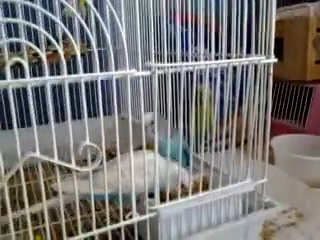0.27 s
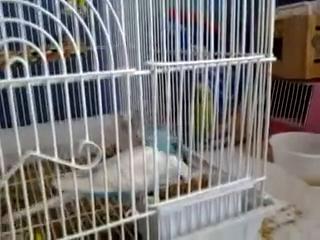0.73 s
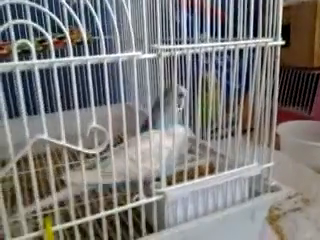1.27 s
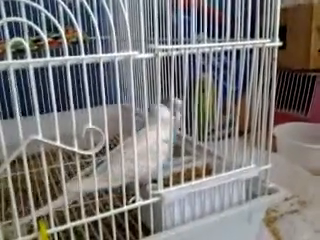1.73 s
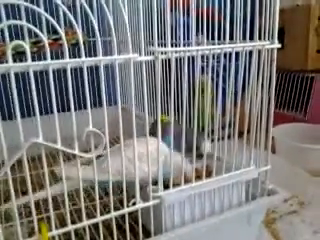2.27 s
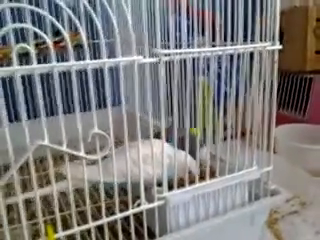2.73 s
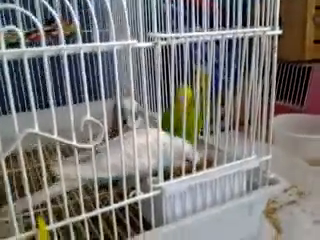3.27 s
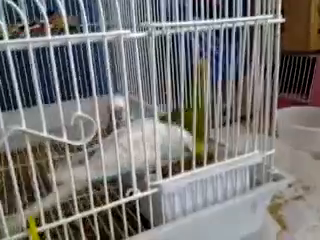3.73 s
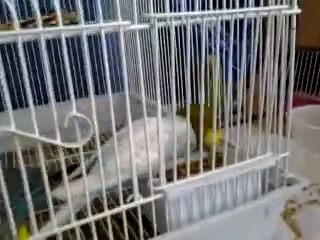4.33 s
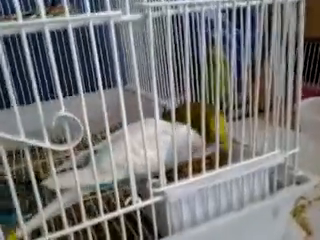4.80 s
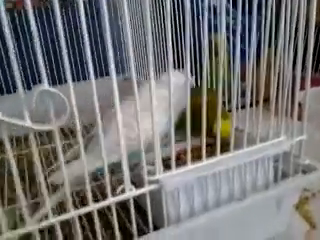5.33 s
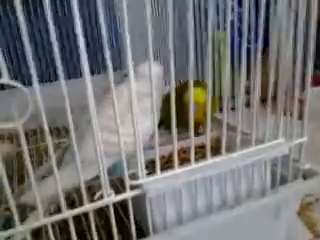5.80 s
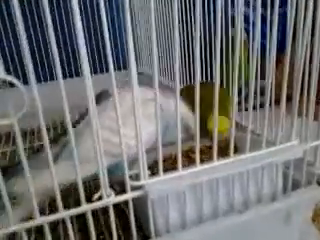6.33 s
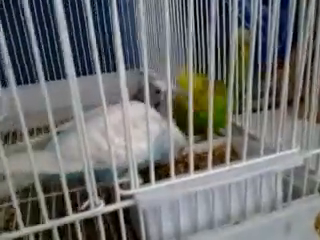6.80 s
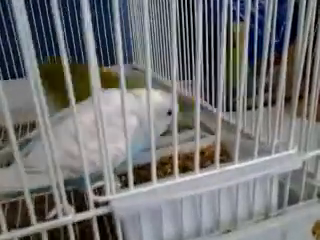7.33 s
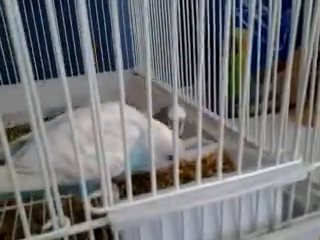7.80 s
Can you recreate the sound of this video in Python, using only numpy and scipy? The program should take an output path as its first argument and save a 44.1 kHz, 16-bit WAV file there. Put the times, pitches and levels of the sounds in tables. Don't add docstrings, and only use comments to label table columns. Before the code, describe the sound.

Indoors, small parrots feed at a plastic dish close to a cheap camera microphone. Low appliance hum, soft air noise and a faint breathy duct note continue throughout. In the first 0.3 seconds, a cluster of dull knocks on furniture rings in the room, with a low stir beneath. A beak taps the dish at 0.4, then harder plastic clacks come at 0.8, 1.1 and 1.2, mixed with short husk rasps. Crisp seed cracks scatter from 1.3 to 3.8, with a light tap at 2.2. Around 4.3 to 4.6 come soft distant knocks, a rasp and another light tap; small ticks follow at 5. At 5.55 a tiny squeak rises, breaks hoarsely and falls, trailed by grinding. Sharp snaps stand out at 6.0, 6.45 (the brightest) and 7.1, a smaller one at 7.5, and muffled knocks close near 7.7 to 7.9. Treble is coarse and cut off.

```python
import sys
import numpy as np
from scipy import signal
from scipy.fft import rfft, irfft, dct, next_fast_len
from scipy.io import wavfile
from scipy.ndimage import uniform_filter1d

SR = 44100
rng = np.random.default_rng(int(sys.argv[2]) if len(sys.argv) > 2 else 0)


def to_wav(sig):
    pcm = np.clip(np.atleast_2d(sig), -1, 1) * 32767
    pcm = np.round(pcm).astype(np.int16)
    wavfile.write(sys.argv[1], SR, pcm.T)


def invert_db(x):
    u = np.asarray(x, float) / 20
    return 10 ** u


N = 355798
T = np.arange(N) / SR

# frequency in Hz, density in dB per Hz.
RUMBLE = [(5, 2.5), (24, 3), (34, 1.5), (41, 3), (52, -7), (75, -4), (92, 0.5), (110, -3.5), (145, -6),
          (175, -8.5)]
# frequency in Hz, density in dB per Hz.
AIR = [(223, -9.5), (300, -6.5), (515, -11.5), (754, -5), (930, -9), (1470, -6.5), (2100, -9.5),
       (3000, -12), (3600, -14), (4300, -19), (5200, -18.5), (6200, -19), (7500, -28)]
AIR_DB, AIR_SWELL_DB = -45.6, .3
BUSTLE_DB, BUSTLE_FADE_S = 4, .1

# frequency in Hz, width in Hz, level in dB.
HUM = [(61.2, 4, -57.5), (120.7, 5.9, -61.5), (266.3, 3.8, -68), (317.3, 14, -66), (352.7, 10, -68),
       (441, 7.9, -72), (577, 12, -70), (1400, 200, -60.5)]
DUCT_DB, DUCT_SWELL_DB = -59.5, 1.5
# peak in seconds, rise in dB, width in seconds.
DRAUGHTS = [
    (1.6, 4, .35),
    (2.3, 5, .1),
    (2.83, 3, .08),
    (4.99, 6, .07),
    (7.3, 6, .2),
]
BOOM_DB = -67
# time in seconds, level in dB, swell in
# seconds, # fade in seconds.
SWELLS = [
    (0.03, -49, .02, .12),
    (.3, -53, .12, .04),
    (4.45, -58, .06, .15),
    (4.74, -57, .15, .08),
    (6.33, -61, .1, .1),
    (7.84, -54, .12, .12),
]

# start in seconds, level in dB, main note in Hz, blow in ms, thump in dB.
KNOCKS = [(.010, -48, 1480, 22, -12), (.019, -36, 1280, 8.6, -20), (.05, -50, 1100, 25, -8),
          (0.114, -41.5, 634, 8.3, -5), (.161, -36, 640, 7.9, -15), (.2, -53, 780, 19, -8),
          (.269, -37.5, 1900, 5.8, -6), (.305, -47, 620, 19, 1), (4.26, -52, 690, 49, -17),
          (4.31, -46.5, 1320, 26, -14), (4.521, -55.5, 1400, 49, -14), (6.156, -48.5, 1240, 27, -17),
          (7.701, -43.5, 1230, 25, -16), (7.722, -46, 884, 19, -14), (7.8, -52, 1250, 12, -8),
          (7.858, -53, 1420, 29, -7)]
# frequency in Hz, width in Hz, level in dB.
KNOCK_BODY = [(620, 200, -6), (1050, 300, -2), (1450, 400, -4), (1950, 500, -4), (2500, 500, -5)]
KNOCK_REACH_HZ_MS = 40000
ROOM_T60_S, ROOM_DB = 0.62, -7

# time in seconds, pitch in Hz, level in dB.
SQUEAK = [
    (5.548, 1475, -66),
    (5.557, 1536, -42),
    (5.566, 1638, -40),
    (5.574, 1682, -35),
    (5.58, 1534, -37),
    (5.587, 1400, -38.5),
    (5.594, 1290, -44.5),
    (5.601, 1130, -52),
    (5.612, 1000, -60),
]
THROAT_HZ, THROAT_WIDTH_HZ, THROAT_DB = 3400, 420, 2
BREAK_S, BREAK_LENGTH_S = 5.577, .016
CLEAR_DB, HOARSE_DB = -15, -4

# start in seconds, level in dB, length in ms, middle hollow in dB, top hollow in dB.
GRINDS = [(.809, -42.5, 11.3, -1, -11), (.822, -46.5, 21, -2, -7), (.894, -41, 18, -0.5, -21),
          (.942, -45.5, 17, -5.5, -19), (1.133, -44, 17, 3, -11), (2.237, -47, 9.3, -1, -17),
          (2.774, -47, 11, 0, -9), (2.817, -52.5, 39, -4, 0), (2.918, -52.5, 20, 5, 6),
          (4.463, -44, 17, 1, -7), (5.58, -47, 27, -2, 4), (5.61, -51.5, 28, -4, -1),
          (5.641, -41, 18, 7, -9.5), (6.45, -48, 14, 0, 6), (7.255, -56.5, 8.3, -6, 10),
          (7.472, -56.5, 9.5, 4, 12)]
# frequency in Hz, width in Hz.
BEAK = [(2250, 820), (4450, 550), (6000, 1400)]

# start in seconds, peak in dB, brightest note in Hz, dish thud in dB.
CRACKS = [(0.7841, -37, 4530, -15), (1.3053, -37, 6900, -17), (1.4572, -35, 5730, -18),
          (1.475, -46, 4760, -12), (1.632, -40, 6800, -15), (1.718, -37, 6670, -16),
          (1.7414, -38.5, 6790, -3), (2.3754, -48, 5890, -1), (2.445, -38, 5080, -8),
          (2.6751, -33, 5900, -23), (2.9238, -33, 4930, -13), (3.1328, -41, 5660, -7),
          (3.2336, -40, 6770, -8), (3.2404, -40.5, 6020, -15), (3.336, -36, 5530, -18),
          (3.3874, -44, 5870, -7), (3.801, -38, 5560, -15), (4.9952, -48, 6620, 1), (5.0414, -45, 5770, -2),
          (5.0624, -36.5, 6800, -14), (5.4249, -39, 6040, -3.5), (5.914, -42, 5150, -6),
          (5.9977, -30, 5670, -29), (6.3937, -40, 6600, -11), (6.398, -39.5, 5700, -14),
          (6.4463, -25.5, 5370, -20), (7.113, -30.5, 5800, -17), (7.4702, -37, 6010, -13)]
# frequency in Hz, width in Hz, level in dB.
DISH = [(810, 500, -8.5), (1580, 800, -1), (2400, 810, -2.5)]
SPLINTER_MS, SCATTER_DB = .62, -16

# start in seconds, peak in dB, wall in dB, rim in dB,
# pitch of the struck spot as a ratio.
STRIKES = [
    (.3776, -24, -22, -3, .62),
    (0.8071, -22, -8, -2, .9),
    (1.0971, -18.5, -7, -4.5, .99),
    (1.196, -22, -12, 1, .88),
    (2.2361, -34, -6, -2, .99),
    (4.6201, -34, -11, 2, .8),
]
# frequency in Hz, width in Hz, level in dB.
WALL = [(760, 350, 3), (300, 260, -7)]
# frequency in Hz, width in Hz, level in dB.
RIM = [(1590, 600, -5), (2400, 600, 2), (2800, 400, 0)]
# frequency in Hz, width in Hz, level in dB.
EDGE = [(4200, 700, 2), (5250, 450, 6), (6660, 1200, -8.5)]
CONTACT_MS, RATTLE, WALL_LAG_MS = .9, .12, 1.2

CAMERA_HZ = 16000
# start in seconds, end in seconds, lost above in Hz.
DROPOUTS = [
    (.851, .855, 4300),
    (1.051, 1.086, 4200),
    (1.106, 1.111, 4500),
    (5.531, 5.553, 4500),
    (6.427, 6.438, 6200),
]
BLOCK_S = .064
# first in seconds, last in seconds, first level in dB,
# last level in dB.
PIP_RUNS = [(.0804, .2723, -76, -75), (.7856, .911, -74.5, -66.5), (1.1034, 1.1034, -54, -54),
            (1.296, 1.488, -79, -64), (1.6795, 1.7439, -64, -74), (2.2566, 2.2566, -59, -59),
            (2.449, 2.449, -70.5, -70.5), (2.7038, 2.832, -66, -63), (2.896, 2.961, -77.5, -61),
            (3.2805, 3.3455, -75.5, -56), (3.4082, 3.4082, -69.5, -69.5), (3.7918, 3.8561, -82.5, -75),
            (4.496, 4.6867, -66.5, -68), (5.1362, 5.1362, -81, -81), (5.456, 5.456, -72.5, -72.5),
            (5.5842, 5.5842, -68.5, -68.5), (5.7119, 5.7119, -81, -81), (6.0313, 6.2236, -74, -70),
            (6.4154, 6.4797, -64.5, -66.5), (7.1203, 7.1833, -65, -77.5), (7.5038, 7.5038, -71, -71),
            (7.6959, 7.7598, -81, -79)]


def unit(x):
    return x / np.sqrt(np.mean(x ** 2))


def ring(x, hz, width):
    return signal.lfilter(*signal.iirpeak(hz, hz / width, fs=SR), x)


def body(x, modes):
    return sum((-1) ** k * invert_db(db) * ring(x, hz, width) for k, (hz, width, db) in enumerate(modes))


def add(out, s, sound):
    i = int(s * SR)
    out[i:i + len(sound)] += sound[:N - i]


def walk(rate):
    k = int(SR / rate)
    held = np.repeat(rng.standard_normal(N // k + 1), k)
    return 1.62 * uniform_filter1d(uniform_filter1d(held, k), k)[:N]


def air():
    size = next_fast_len(N)
    hz = np.arange(size // 2 + 1) * SR / size + 1e-3
    points = np.array(RUMBLE + AIR)
    colour = invert_db(np.interp(np.log(hz), np.log(points[:, 0]), points[:, 1]))
    noise = irfft(rfft(rng.standard_normal(size)) * colour, size)[:N]
    middle = signal.sosfilt(signal.butter(4, (200, 4000), "bandpass", fs=SR, output="sos"), noise)
    treble = signal.sosfiltfilt(signal.butter(2, 3500, "highpass", fs=SR, output="sos"), noise)
    flicker = invert_db(0.59 * walk(8) + 1.0 * walk(40))
    noise = noise + treble * (flicker - 1)
    bustle_db = BUSTLE_DB * np.exp(-T / BUSTLE_FADE_S)
    return noise / np.std(middle) * invert_db(AIR_DB + AIR_SWELL_DB * walk(1.5) + bustle_db - 4.5)


def duct():
    draughts_db = sum(db * np.exp(-((T - s) / wide) ** 2) for s, db, wide in DRAUGHTS)
    level_db = DUCT_DB + DUCT_SWELL_DB * walk(5) + draughts_db
    return invert_db(level_db - 2.5) * unit(ring(ring(rng.standard_normal(N), 752, 50), 749, 90))


def boom():
    level = invert_db(BOOM_DB)
    for s, db, swell, fade in SWELLS:
        level = level + invert_db(db) * np.exp(np.where(T < s, (T - s) / swell, (s - T) / fade))
    return level * invert_db(-1.5) * unit(ring(ring(rng.standard_normal(N), 145, 11), 145, 28))


def hum():
    out = np.zeros(N)
    for hz, width, db in HUM:
        blur = unit(ring(ring(rng.standard_normal(N), hz, width), hz, 2 * width))
        steady = np.sin(2 * np.pi * hz * T + 1.5 * walk(3)) * (width < 8)
        out += invert_db(db) * unit(blur + 3.8 * steady)
    return out


def room(x):
    t = T[:SR // 2]
    tail = rng.standard_normal(len(t)) * np.exp(-np.log(1000) * t / ROOM_T60_S) * np.minimum(t / 0.0082, 1)
    tail = ring(tail, 1100, 3000)
    return invert_db(ROOM_DB) * signal.fftconvolve(x, tail / np.sqrt(np.sum(tail ** 2)))[:N]


def knocks():
    out, t = np.zeros(N), T[:16384]
    for s, db, hz, ms, thump_db in KNOCKS:
        blow = rng.standard_normal(len(t)) * np.exp(-t * 1000 / ms) * np.minimum(t / .003, 1)
        hollows = ring(body(blow, KNOCK_BODY), 1100, KNOCK_REACH_HZ_MS / ms)
        wood = 1.1 * ring(blow, hz, 150) + 0.95 * hollows
        thump = ring(ring(blow, 152, 16), 145, 40)
        sound = unit(wood) + invert_db(thump_db) * unit(thump)
        add(out, s, invert_db(db) * sound * np.sqrt(ms / 1000 / t[-1]))
    return out


def squeak():
    s, *columns = np.transpose(SQUEAK)
    t = T[int(s[0] * SR):int(s[-1] * SR)]
    hz, db = (np.interp(t, s, c) for c in columns)
    phase = 2 * np.pi * np.cumsum(hz) / SR
    broken = np.clip((t - BREAK_S) / BREAK_LENGTH_S, 0, 1)
    roughness = unit(uniform_filter1d(rng.standard_normal(len(t)), size=60))
    hoarse = 1 + (.5 + .4 * broken) * roughness
    throat = invert_db(THROAT_DB) / (1 + ((2 * hz - THROAT_HZ) / THROAT_WIDTH_HZ * 2) ** 2)
    second = throat + .15 + .45 * broken * (hoarse - .6)
    upper_level = invert_db(CLEAR_DB + (HOARSE_DB - CLEAR_DB) * broken) * hoarse
    upper = upper_level * (np.sin(3 * phase) + np.sin(4 * phase))
    out = np.zeros(N)
    add(out, s[0], np.sqrt(2) * invert_db(db) * (np.sin(phase) + second * np.sin(2 * phase) + upper))
    return out


def grinds():
    out, t = np.zeros(N), T[:2048]
    for (s, db, ms, middle_db, top_db), chance in zip(GRINDS, rng.standard_normal((len(GRINDS), 2, 2048))):
        shape = np.sin(np.pi * np.clip(t * 1000 / ms, 0, 1)) ** .5
        uneven = invert_db(2.3 * uniform_filter1d(chance[1], size=40) * np.sqrt(40))
        ticks = shape * chance[0] * uneven
        low, middle, top = (ring(ring(ticks, hz, width), hz, 2 * width) for hz, width in BEAK)
        rasp = low + invert_db(middle_db) * middle + invert_db(top_db) * top + .18 * ticks
        add(out, s, invert_db(db) * rasp / np.sqrt(np.sum(rasp ** 2) / (ms * SR / 1000)))
    return out


def cracks():
    out, t = np.zeros(N), T[:2048]
    for (s, peak_db, hz, thud_db), chance in zip(CRACKS, rng.standard_normal((len(CRACKS), 2, 2048))):
        snap = (t == 0) + .4 * chance[0] * np.exp(-t * 1000 / SPLINTER_MS)
        shell = ring(snap, hz, 2000) + .6 * ring(snap, 4500, 5000)
        dish = body(snap, DISH)
        scatter = ring(chance[1] * np.exp(-t / 0.011), 4600, 3700)
        sound = shell / np.abs(shell).max() + invert_db(thud_db) * dish / np.abs(dish).max()
        sound = sound + invert_db(SCATTER_DB) * scatter
        add(out, s + 0.00055, invert_db(peak_db + 5.5) * sound)
    return out


def struck(blow, modes, spot):
    return unit(sum(invert_db(db) * ring(ring(blow, hz * spot, width), hz * spot, 1.6 * width)
                    for hz, width, db in modes))


def strikes():
    out, t = np.zeros(N), T[:2048]
    for s, peak_db, wall_db, rim_db, spot in STRIKES:
        blow = (t == 0) + RATTLE * rng.standard_normal(len(t)) * np.exp(-t * 1000 / CONTACT_MS)
        wall, rim, edge = (struck(blow, modes, spot) for modes in (WALL, RIM, EDGE))
        late_wall = np.roll(wall, int(WALL_LAG_MS * SR / 1000))
        sound = invert_db(wall_db) * late_wall + invert_db(rim_db) * rim - edge + .15 * unit(blow)
        add(out, s, invert_db(peak_db) * sound / np.abs(sound).max())
    return out


def scene():
    birds = strikes() + cracks() + grinds() + squeak()
    far = knocks()
    background = air() + duct() + boom() + hum()
    return (birds + far + room(far + invert_db(-13) * birds) + background)[None]


def lapped(x, size, change):
    count, half = N // size + 2, size // 2
    window = np.sin(np.pi * (np.arange(2 * size) + .5) / (2 * size))
    padded = np.pad(x, (size, (count + 1) * size - N - size)).reshape(-1, size)
    a, b, c, d = np.split(np.hstack([padded[:-1], padded[1:]]) * window, 4, axis=1)
    lines = dct(np.hstack([-c[:, ::-1] - d, a - b[:, ::-1]]), type=4, norm="ortho")
    lines = change(np.arange(count)[:, None] * size / SR, (np.arange(size) + .5) * SR / 2 / size, lines)
    u, v = np.split(dct(lines, type=4, norm="ortho"), [half], axis=1)
    blocks = np.hstack([v, -v[:, ::-1], -u[:, ::-1], -u]) * window
    return (blocks[:-1, size:] + blocks[1:, :size]).ravel()[:N]


def pip_rows():
    rows = []
    for first, last, first_db, last_db in PIP_RUNS:
        count = round((last - first) / BLOCK_S) + 1
        rows += zip(first + BLOCK_S * np.arange(count), np.linspace(first_db, last_db, count))
    return np.array(rows)


def starve(x):
    pips = pip_rows()[:, 0] - .024
    sudden = np.array([row[0] for row in STRIKES + GRINDS + CRACKS])

    def long_blocks(s, hz, lines):
        step = 2.9 * uniform_filter1d(np.abs(lines), size=48) * np.clip((hz - 2200) / 2200, .01, 1)
        odds = (hz > 3900) * .14 + (hz > 7230)
        lost = rng.random((len(s), 200))[:, (hz // 115).astype(int)] < odds
        no_pip = np.all(abs(s - pips) > .04, axis=1, keepdims=True)
        no_sudden = np.all(abs(s - sudden) > .045, axis=1, keepdims=True)
        return np.where(no_pip & no_sudden, np.round(lines / (step + 1e-9)) * step * ~lost, lines)

    def short_blocks(s, hz, lines):
        busy = np.any(abs(s - pips) < .036, axis=1, keepdims=True)
        odds = (hz > 4000) * .1 + (hz > 6400) * .1 + (hz > 6800) * .2
        luck = np.repeat(rng.random((len(s), 60)), 2, axis=0)[:len(s), (hz // 400).astype(int)]
        strength = uniform_filter1d(np.abs(lines), size=7)
        faint = strength < 1.6 * np.median(strength, axis=0)
        return lines * (luck > 1.7 * odds * busy * faint)

    return lapped(lapped(x, size=2822, change=long_blocks), size=352, change=short_blocks)


def drop_treble(x):
    for start, end, hz in DROPOUTS:
        hole = uniform_filter1d(1. * ((T > start) & (T < end)), size=120)
        x = x - hole * signal.sosfiltfilt(signal.ellip(6, .1, 50, hz, "highpass", fs=SR, output="sos"), x)
    return x


def camera_pips():
    t, pips = T[:529], np.zeros(N)
    burst = np.sin(np.pi * t / t[-1]) ** 2 * np.sin(np.pi * CAMERA_HZ * t)
    for s, peak_db in pip_rows():
        add(pips, s - .003, invert_db(peak_db + 3) * burst)
    return pips


def roll_off(x):
    return signal.sosfilt(signal.butter(12, 9100, fs=SR, output="sos"), x)


def record(dry):
    x = drop_treble(starve(dry[0]))
    x = signal.sosfiltfilt(signal.cheby2(16, 30, 7480, fs=SR, output="sos"), x)
    folded = x * np.cos(2 * np.pi * CAMERA_HZ * T)
    mirror = ring(ring(ring(folded, 8850, 300), 8850, 300), 8850, 400)
    x = x * np.minimum(T / .006, 1)
    offset = .0017
    rounding = invert_db(-101) * rng.standard_normal(N)
    return roll_off((x + invert_db(-24) * mirror + camera_pips() + offset + rounding)[None])


dry = scene()
out = record(dry)
to_wav(out)
```